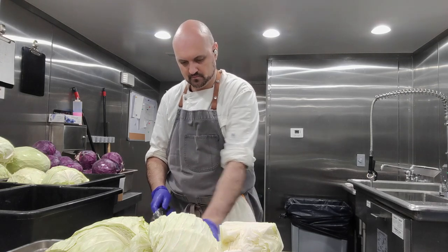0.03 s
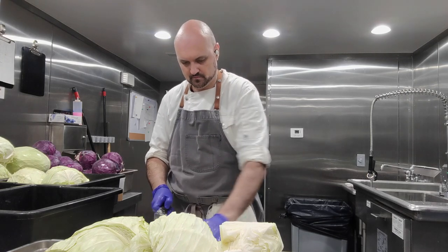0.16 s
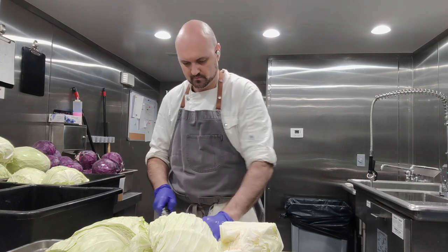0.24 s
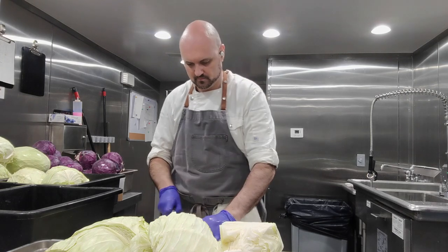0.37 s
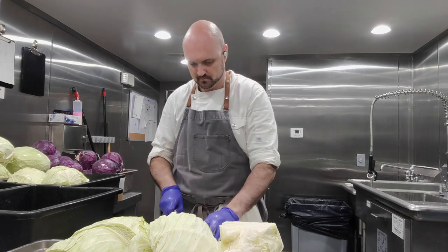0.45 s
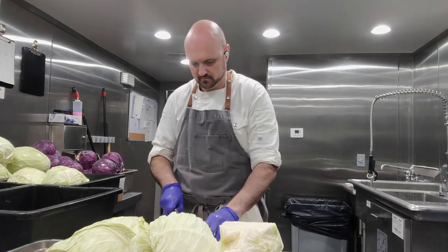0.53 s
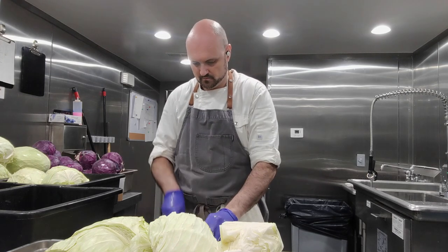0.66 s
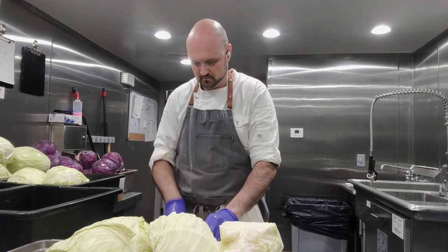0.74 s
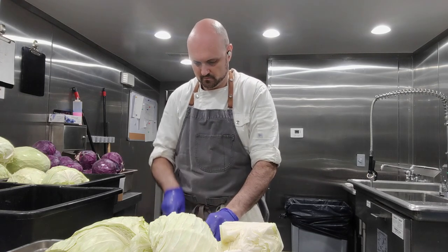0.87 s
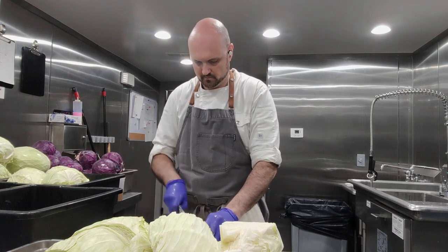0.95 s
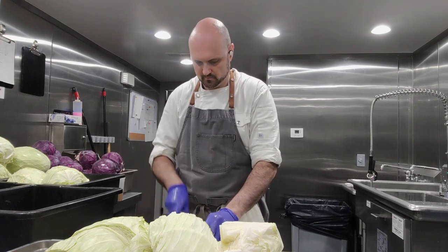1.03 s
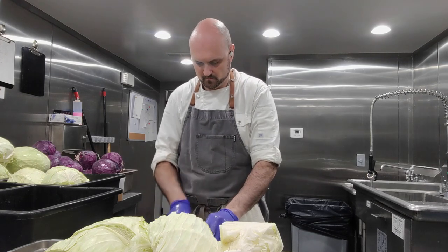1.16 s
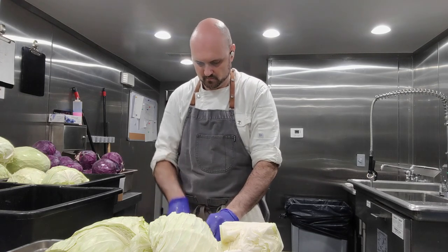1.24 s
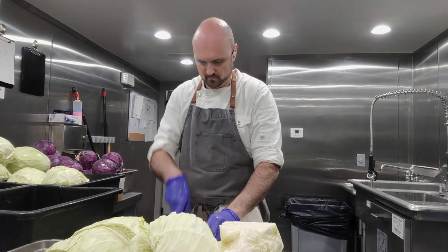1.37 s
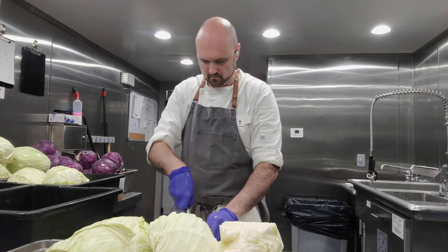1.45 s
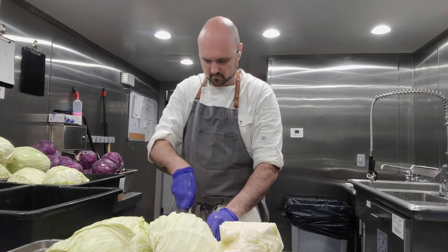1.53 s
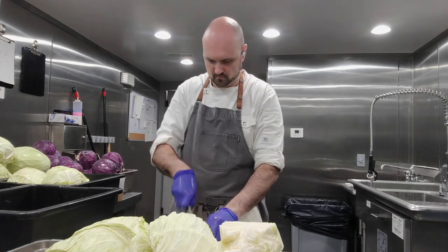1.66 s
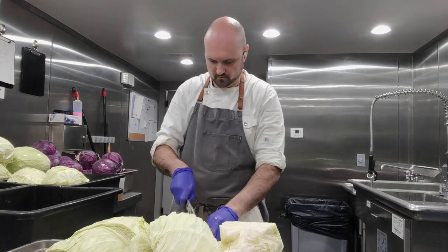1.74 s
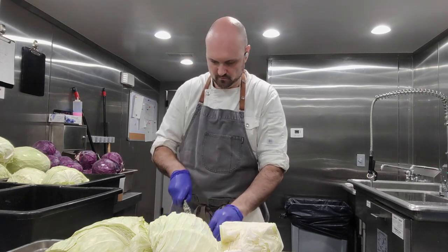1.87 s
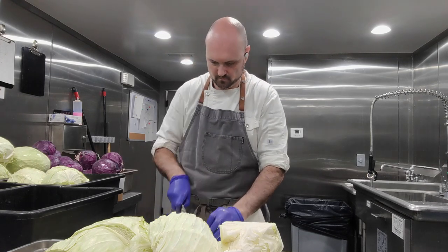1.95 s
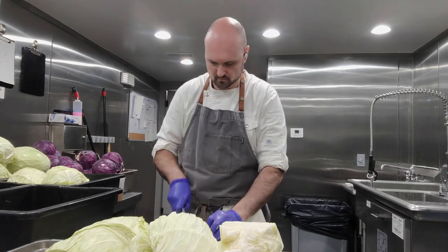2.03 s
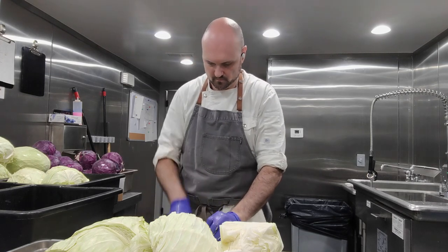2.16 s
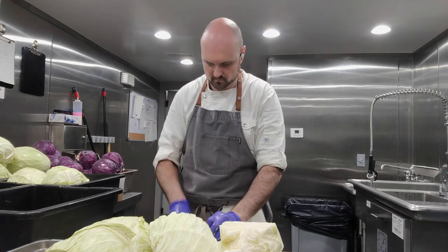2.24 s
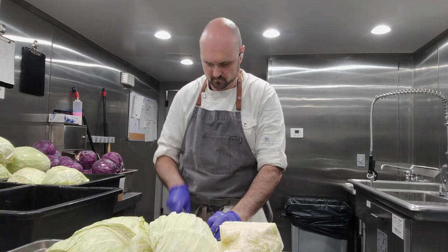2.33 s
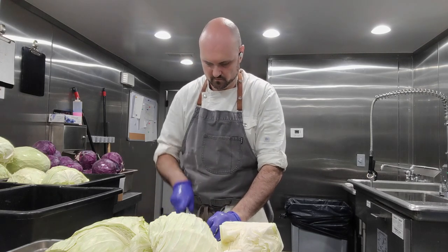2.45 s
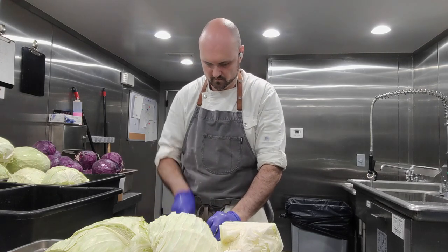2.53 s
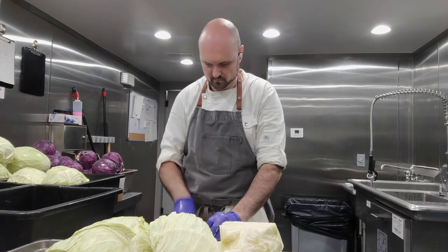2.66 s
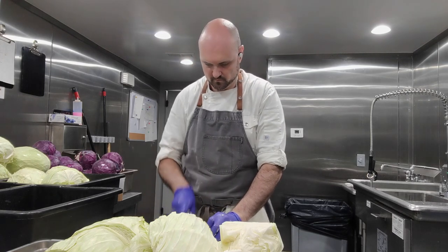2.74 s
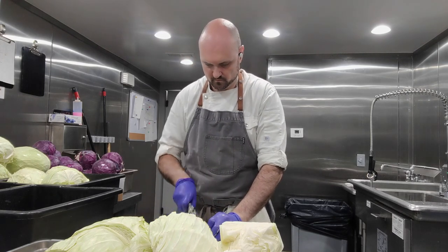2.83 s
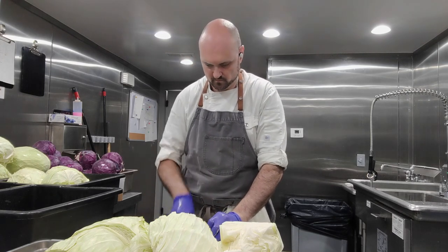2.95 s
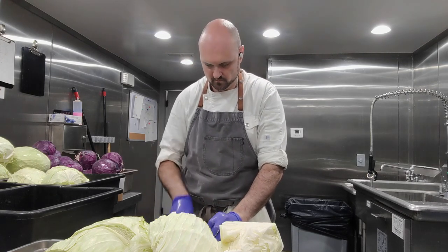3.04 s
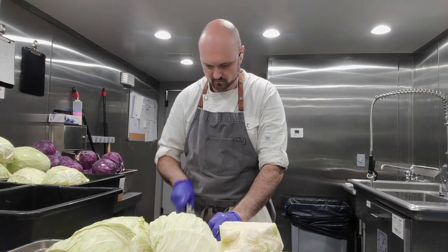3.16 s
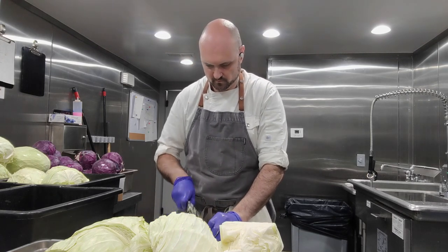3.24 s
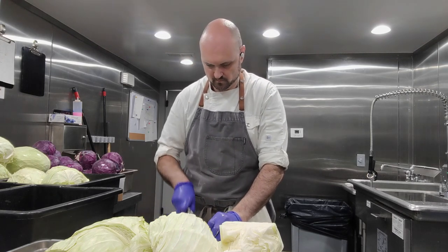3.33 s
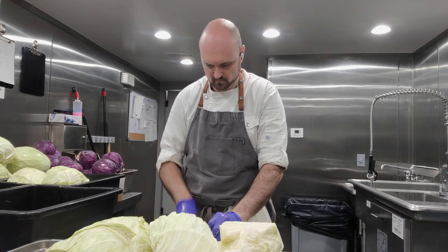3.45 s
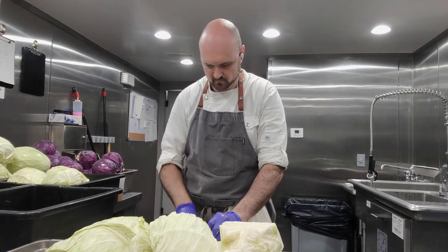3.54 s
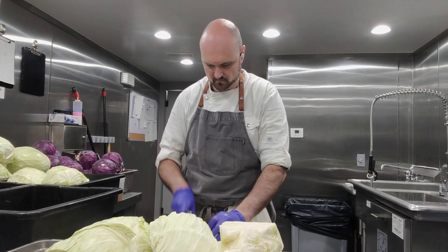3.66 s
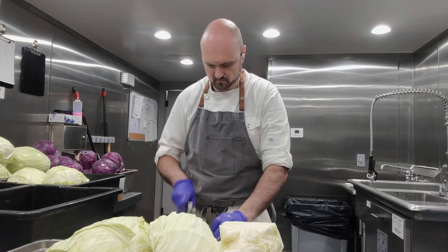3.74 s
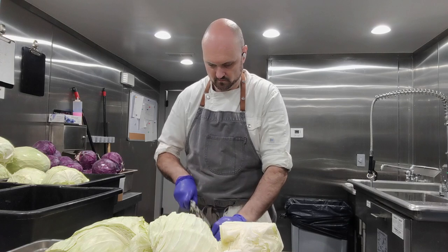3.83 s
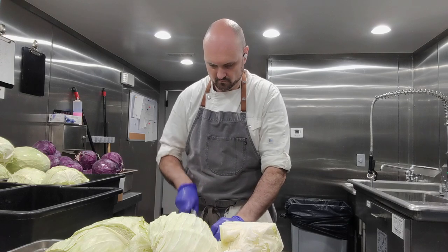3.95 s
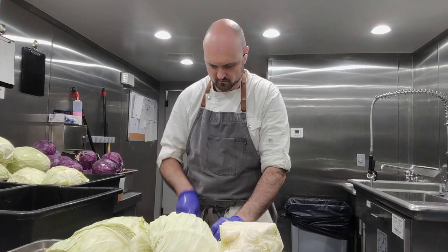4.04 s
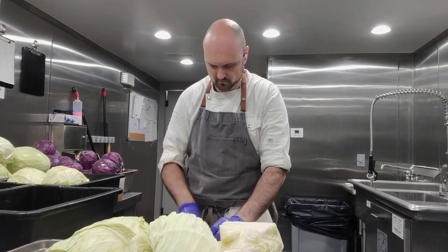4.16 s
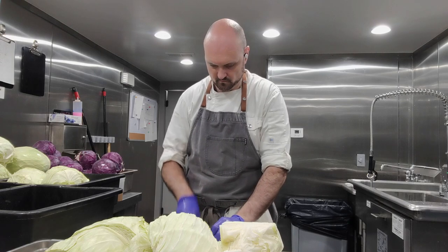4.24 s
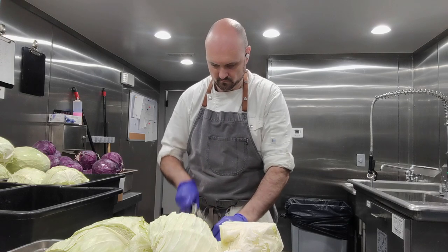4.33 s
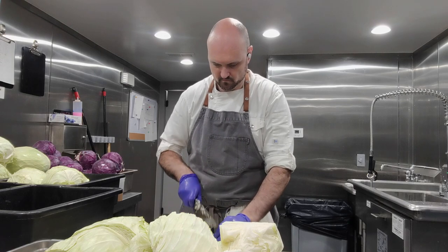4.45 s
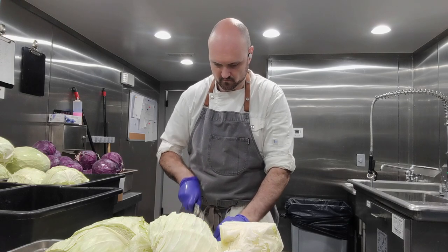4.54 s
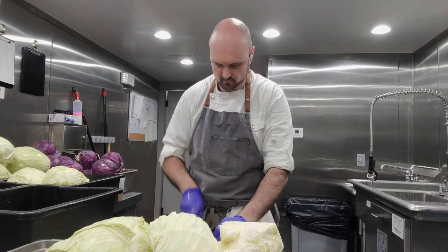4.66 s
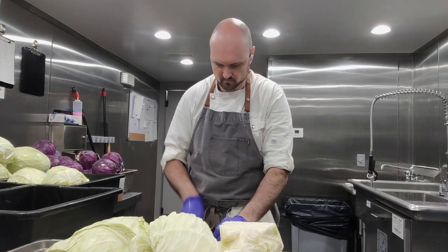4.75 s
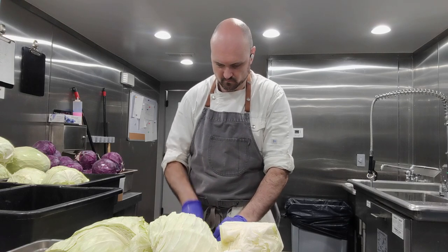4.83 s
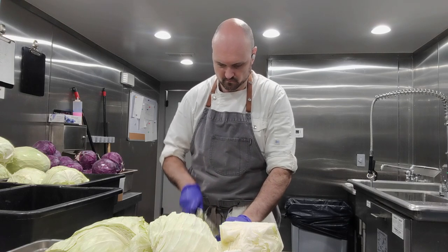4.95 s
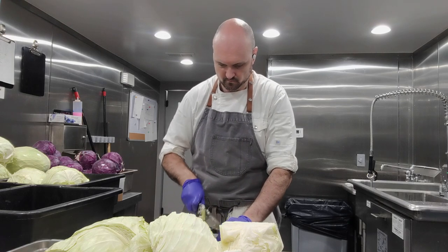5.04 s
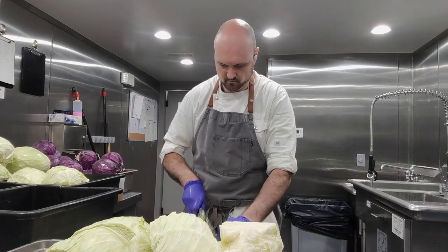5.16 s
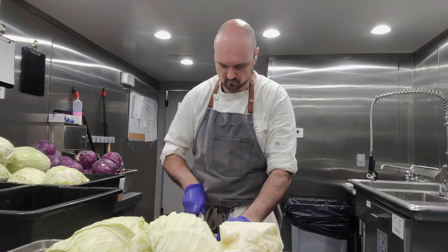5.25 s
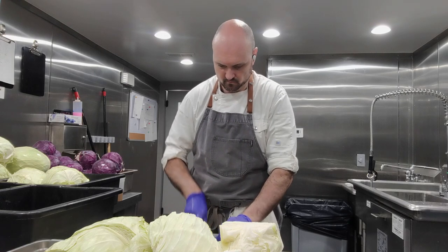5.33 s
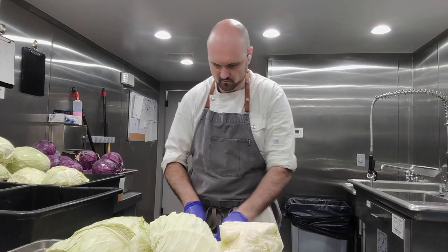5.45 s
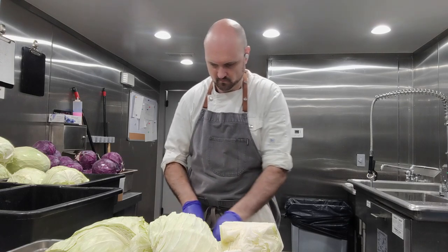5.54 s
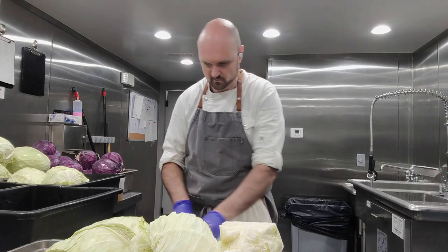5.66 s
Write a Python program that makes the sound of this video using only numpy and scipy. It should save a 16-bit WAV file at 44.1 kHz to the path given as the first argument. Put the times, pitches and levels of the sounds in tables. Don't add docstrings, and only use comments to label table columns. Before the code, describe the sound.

A knife crunches crisply through cabbage and thuds onto a plastic board about twice a second, over low steady kitchen hum and fan air.

```python
import sys
import numpy as np
from scipy import signal
from scipy.fft import rfft, irfft, next_fast_len
from scipy.io import wavfile
from scipy.ndimage import uniform_filter1d

SR = 44100
rng = np.random.default_rng(int(sys.argv[2]) if len(sys.argv) > 2 else 0)


def bounce(signal):
    frames = np.transpose(np.atleast_2d(signal))
    limited = np.clip(frames, -1, 1)
    pcm = np.round(limited * 32767).astype(np.int16)
    wavfile.write(sys.argv[1], SR, pcm)


def undo_db(level):
    steps = np.asarray(level, float) / 20
    return 10 ** steps


N = 251034
T = np.arange(N) / SR

# start/s, length/s, level on entry/dB, level at end/dB, dullness/dB
STROKES = [(0.067, 0.17, -69, -56, 10.5), (0.257, 0.067, -52.5, -59, 11.5),
           (0.634, 0.089, -59, -46.5, -0.5), (0.727, 0.12, -49, -54.5, -2), (1.061, 0.047, -63, -43, -7),
           (1.115, 0.086, -45.5, -45.5, 0), (1.509, .04, -54.5, -56.5, -7), (1.786, 0.035, -66, -72, 10),
           (1.997, 0.044, -65, -59, -1), (2.077, 0.17, -51, -45.5, 0), (2.235, 0.041, -50, -64, -10),
           (2.528, 0.097, -53, -37, -0.5), (2.942, 0.051, -60, -43.5, -2.5), (3.008, 0.06, -53, -52, 3),
           (3.355, .03, -61, -67, -4), (3.405, 0.06, -52.5, -43.5, -4.5), (3.458, 0.086, -44.5, -42, 2.5),
           (3.969, 0.027, -50, -65, -5), (4.031, 0.085, -51, -39, -0.5), (4.132, 0.05, -50, -43, 5.5),
           (4.622, 0.023, -52.5, -61.5, 7), (4.67, .035, -55, -51.5, -8), (4.698, 0.13, -50.5, -41.5, -1.5),
           (5.26, .13, -68.5, -48.5, -4),
           (5.387, 0.033, -47.5, -42.5, 3),
    (5.44, 0.055, -55, -48.5, -12),
    (5.585, .11, -54, -66, 11),
           (1.34, 0.14, -70, -66, 6), (1.9, 0.046, -65, -66.5, 0), (0.004, .07, -74, -76, 20),
          (0.61, 0.032, -72, -66, -3), (2.9, 0.092, -64, -73, 11), (4.86, .14, -58, -74, -12),
          (.33, .12, -67, -67.5, 5), (1.73, .08, -73, -72, -4)]
# t/s, level/dB
SKIN_BURSTS = [(0.0, -63), (.648, -62), (1.067, -62), (1.098, -53), (2.015, -62), (2.53, -62), (2.955, -59),
               (3.401, -50), (4.035, -55), (4.05, -51), (4.625, -61), (4.708, -51), (4.795, -50),
               (5.259, -58), (5.598, -54)]
# centre f/Hz, room t60/s, level re treble/dB, share of dullness, share heard directly
TEAR_BANDS = [(1550, 0.58, -10, 0.76, 0.19), (4220, 0.5, -5, 0.35, 0.41), (8490, 0.45, -2, -0.2, 0.39),
              (9800, 0.43, -10, -.1, 0.45), (14700, 0.33, -19, -.2, .49)]
# f/Hz, level/dB per Hz
TEAR_TONE = [(530, -33), (900, -20), (978, -5.5), (1100, -5.5), (1450, -7.5), (1800, -7.5), (2200, -9),
             (2310, -8.5), (2510, -9.5), (4890, -9.5), (6670, -9.5), (8470, -5), (11100, -36.5),
             (15600, -53)]
DEEPER_DB = 5.5
BITE_S, LET_GO_S = 0.009, 0.019
SKIN_S, SKIN_DULL_DB = 0.012, 1
SKIN_TOP_DB = 5

# table bass/dB, board bass/dB, low ring/dB
LANDINGS = [
    (0.298, -50, 0, -4, 6.5),
    (0.787, -24, -10, -3.5, -1),
    (1.203, -20, -8, -3, -4),
    (2.231, -18, -12, -5.5, -6),
    (2.66, -14.5, -12.5, -7.5, -6),
    (3.066, -24, -7, -5.5, -2.5),
    (3.55, -25.5, -5, -2.5, 1.5),
    (4.182, -19.5, -5, -8.5, 0.5),
    (4.833, -25.5, -3.5, -1.5, 0.5),
    (5.416, -26.5, 1, 0, 3.5),
]
# f/Hz, level/dB, t60/s
BOARD_MODES = [(195.3, 4.5, 0.12), (242.4, -4.5, 0.31), (270.2, 4.5, 0.13), (339, -3.5, 0.28),
               (440.8, -10, 0.43), (445, -7.5, 0.063), (526, -1.5, 0.043), (618.4, -8.5, 0.12),
               (731, -2.5, 0.092), (757, -12.5, 0.4), (810, 3, 0.034), (822.6, -14.5, 0.45),
               (904, 4.5, 0.023), (943, -12.5, 0.4), (1039, 2.5, 0.054), (1190, -2.5, 0.17),
               (1260, 1.5, 0.055), (1610, -9, 0.05), (1810, -25, .05)]
# f/Hz, level/dB per Hz
THUD_TONE = [(24, -46), (40, -20), (102, -6), (255, -22), (325, 1), (421, 8.5), (545, 1.5), (758, -3.5),
             (1190, -16), (2500, -79), (3250, -47), (5500, -120)]
# delay/s, level/dB
WALL_ECHOES = [(.004, 6), (.009, 2), (.014, 7), (0.019, -22), (0.034, 3.5), (0.051, -0.5), (.062, -1.5),
               (.085, -6), (.118, -9.5), (.150, -13.5)]
UPPER_DB = -12.5
SHUDDER_LAG_S, SHUDDER_DB = 0.048, -17.5

# t/s, peak level/dB, f/Hz
RIB_SNAPS = [(0.6464, -48.5, 3760), (0.903, -55, 4400), (1.1014, -45, 5100), (1.1238, -39.5, 5550),
             (1.1707, -42, 6530), (1.171, -42, 3540), (1.523, -50, 5490), (2.0308, -55, 6300),
             (2.5925, -36, 5030), (2.6414, -34, 2900), (3.5269, -34, 3770), (4.1186, -41, 4200),
             (4.713, -41, 4120), (5.4397, -41, 4300), (5.5087, -42.5, 4380), (5.5994, -46, 5230)]
# t/s, peak level/dB
EDGE_TOUCHES = [(1.0714, -64), (1.52, -48), (1.7, -56), (2.5426, -53), (2.971, -45), (3.4057, -52),
                (3.9774, -54), (4.6843, -44), (5.391, -42)]
# f/Hz, level/dB, t60/s
BLADE_PING = [(8750, -55, 0.42), (10600, -71, 0.23), (11800, -74, 0.2), (14000, -76, .2), (7300, -60, 0.19)]
# start/s, end/s, f/Hz
SQUEAK = (.895, 1.1, 4560)
RIB_WIDTH_HZ, RIB_T60_S = 400, 0.33
BRIGHT_HZ, BRIGHT_WIDTH_HZ, BRIGHT_T60_S = 8300, 1100, 0.25
PING_S = 1.518

# f/Hz, level/dB
HUM = [(120, -42.5), (240, -64.5)]
# f/Hz, level/dB per Hz
FAN_TONE = [(15, -47), (25, -32), (37, -33), (84, -27.5), (126, -1.5), (156, -10), (193, -14), (267, -17),
            (340, -19.5), (805, -21), (972, -28.5), (1850, -40.5), (6570, -47.5), (8150, -51),
            (15600, -57.5)]
# f/Hz, width/Hz, level/dB
FAN_DUCTS = [(74, 31, -59), (185.3, 31.5, -56.5), (263.9, 7.7, -59.5), (967, 225, -62)]
SWELL_DB, SWELL_PER_S = 3.2, 3.7


def tearing(rate=2500, spread_db=4, patchy_db=3.0):
    size_db = spread_db * np.minimum(rng.exponential(1, N), 4)
    happens = rng.random(N) < rate / SR
    snaps = happens * rng.choice([-1, 1], N) * undo_db(size_db + patchy_db * walk(40))
    centres = np.array(TEAR_BANDS)[:, 0]
    cracks = split(leafy(snaps), centres)
    echoes = split(leafy(rng.standard_normal(N)), centres)
    out = 0
    for (hz, t60, trim_db, dull_share, direct), crack, echo in zip(TEAR_BANDS, cracks, echoes):
        given = effort(dull_share, hz) * undo_db(trim_db) ** 2
        close = level(crack, 0)
        keep = np.exp(-np.log(1e6) / (t60 * SR))
        held = signal.lfilter([1 - keep], [1, -keep], close ** 2 * given)
        room = np.sqrt(max(1 - direct ** 2, 0) * held) * level(echo, 0)
        out = out + room + direct * close * np.sqrt(given)
    return out


def effort(dull_share, hz):
    power = np.full(N, 1e-14)
    for s, length, in_db, end_db, dull_db in STROKES:
        t = T[:int((length + 0.3) * SR)]
        depth = np.minimum(t / length, 1)
        dulling = dull_share * (dull_db + DEEPER_DB * (2 * depth - 1))
        db = in_db + (end_db - in_db) * depth + dulling
        bite = np.minimum(t / BITE_S, 1)
        let_go = np.exp(-np.maximum(t - length, 0) / LET_GO_S)
        add(power, s, undo_db(db) ** 2 * bite * let_go)
    for s, db in SKIN_BURSTS:
        top_db = SKIN_TOP_DB * max(np.log2(hz / BRIGHT_HZ), 0)
        burst = undo_db(db + dull_share * SKIN_DULL_DB + top_db) ** 2
        add(power, s, burst * np.exp(-T[:SR // 5] / SKIN_S))
    return power


def leafy(x, pocket_db=1.5, peak_hz=8400, peak_width_hz=1000, peak_db=-4):
    cells = signal.stft(colour(x, TEAR_TONE), nperseg=256)[2]
    pockets = uniform_filter1d(rng.standard_normal(cells.shape), size=3, axis=0)
    pockets = uniform_filter1d(pockets, size=7, axis=1)
    x = signal.istft(cells * undo_db(pocket_db * pockets / pockets.std()), nperseg=256)[1][:N]
    return x + undo_db(peak_db) * ring(x, peak_hz, peak_width_hz)


def landings(push_s=0.00052, scatter_db=2.2, first_db=2.0, diffuse_db=0, room_db=3, room_t60=0.63,
             crack_db=4, gain_db=-17):
    out, t = np.zeros(N), T[:int(0.6 * SR)]
    hz, db, t60 = np.array(BOARD_MODES).T[:, :, None]
    side = (-1) ** np.arange(len(BOARD_MODES))[:, None]
    push = np.hanning(int(push_s * SR) + 3)
    build = 1 - np.exp(-t / 0.0012)
    fade = np.exp(-np.log(1000) * t / room_t60)
    paths = undo_db(diffuse_db) * tail(room_t60) * build
    paths[0] = undo_db(first_db)
    for lag, echo_db in WALL_ECHOES:
        paths[int(lag * SR)] += undo_db(echo_db)
    for s, peak_db, deep_db, bass_db, low_db in LANDINGS:
        up_db = low_db + UPPER_DB
        # f/Hz, level/dB
        tilt = np.array([(60, deep_db - 30), (150, deep_db), (205, deep_db), (245, bass_db), (300, bass_db),
                         (360, low_db), (560, low_db), (640, 0), (850, 0), (1060, up_db)])
        chance = rng.standard_normal((len(BOARD_MODES), 2, 1))
        gain = undo_db(db + np.interp(hz, *tilt.T) + scatter_db * chance[:, 0])
        swing = np.sin(2 * np.pi * hz * (1 + 0.0037 * chance[:, 1]) * t)
        modes = gain * side * swing * np.exp(-np.log(1000) * t / t60)
        crack = undo_db(crack_db + up_db) * np.sin(2 * np.pi * 1250 * t) * np.exp(-t / 0.00046)
        noise = level(colour(rng.standard_normal(len(t)), THUD_TONE), room_db)
        room = colour(noise, tilt) * build * fade
        blow = signal.fftconvolve(modes.sum(0) + crack, paths)[:len(t)] + room
        add(out, s - 0.002, -undo_db(peak_db + gain_db) * np.convolve(blow, push / push.sum()))
    return signal.sosfilt(signal.butter(2, 110, "high", fs=SR, output="sos"), out)


def shudder(hz=62, width_hz=35, length_s=0.06):
    swell = 0
    for s, db, *_ in LANDINGS:
        late = T - s - SHUDDER_LAG_S
        swell = swell + undo_db(db + SHUDDER_DB) * np.exp(-0.5 * (late / length_s) ** 2)
    rumble = ring(ring(rng.standard_normal(N), hz, width_hz), hz, width_hz)
    return swell * level(rumble, -12.5)


def ticks(gain_db=-12, squeak_db=-65, squeak_width_hz=200, ping_width_hz=500):
    out = np.zeros(N)
    ribs = [(*row, RIB_WIDTH_HZ, RIB_T60_S) for row in RIB_SNAPS]
    edges = [(*row, BRIGHT_HZ, BRIGHT_WIDTH_HZ, BRIGHT_T60_S) for row in EDGE_TOUCHES]
    for s, peak_db, hz, width_hz, t60 in ribs + edges:
        x = ring(ring(tail(max(t60, 0.03)), hz, 2 * width_hz), hz, 2 * width_hz)
        start_rms = np.sqrt(np.mean(x[:600] ** 2))
        add(out, s, undo_db(peak_db + gain_db) * x / start_rms)
    for hz, db, t60 in BLADE_PING:
        add(out, PING_S, level(ring(tail(t60, length=0.34), hz, ping_width_hz), db - 12))
    start, end, hz = SQUEAK
    gate = np.interp(T, [start, start + 0.01, end - 0.1, end], [0, 1, 0.55, 0.1], right=0)
    rub = ring(ring(rng.standard_normal(N), hz, squeak_width_hz), hz, squeak_width_hz)
    return out + gate * level(rub, squeak_db)


def machines(air_db=-52, flicker_db=0.0):
    out = np.zeros(N)
    for hz, db in HUM:
        out += np.sqrt(2) * undo_db(db + 1.0 * walk(2.78)) * np.sin(2 * np.pi * hz * T)
    for hz, width_hz, db in FAN_DUCTS:
        out += level(ring(ring(rng.standard_normal(N), hz, 2 * width_hz), hz, 2 * width_hz), db)
    swell = undo_db(SWELL_DB * walk(SWELL_PER_S))
    centres = [60, 200, 400, 700, 1200, 2500, 5000, 10000]
    bands = split(level(colour(rng.standard_normal(N), FAN_TONE), air_db), centres)
    for hz, band in zip(centres, bands):
        drift = swell if 300 < hz < 1400 else 1
        out += undo_db(flicker_db * walk(6.29)) * band * drift
    return out


def tail(t60, length=0.6):
    t = T[:int(length * SR)]
    h = rng.standard_normal(len(t)) * np.exp(-np.log(1000) * t / t60)
    return h / np.sqrt(np.sum(h ** 2))


def ring(x, hz, width_hz):
    return signal.lfilter(*signal.iirpeak(hz, hz / width_hz, fs=SR), x)


def colour(x, tone):
    size = next_fast_len(len(x) + 4096)
    hz = np.arange(size // 2 + 1) * SR / size + 1
    tone_hz, tone_db = np.array(tone).T
    gain = undo_db(np.interp(np.log(hz), np.log(tone_hz), tone_db))
    return irfft(rfft(x, size) * gain, size)[:len(x)]


def split(x, centres):
    size = next_fast_len(len(x))
    log_hz = np.log(np.arange(size // 2 + 1) * SR / size + 1)
    spectrum = rfft(x, size)
    bands = []
    for one in np.eye(len(centres)):
        share = np.interp(log_hz, np.log(centres), one)
        bands.append(irfft(spectrum * share, size)[:len(x)])
    return bands


def walk(rate):
    k = int(SR / rate)
    steps = np.repeat(rng.standard_normal(N // k + 1), k)
    return 0.49 * uniform_filter1d(uniform_filter1d(steps, k), k)[:N]


def level(x, db):
    return x * undo_db(db) / np.sqrt(np.mean(x ** 2))


def add(out, t, x):
    i = int(t * SR)
    out[i:i + len(x)] += x[:len(out) - i]


def scene():
    return (tearing() + landings() + shudder() + ticks() + machines())[None]


def band_limit(x):
    return signal.sosfilt(signal.butter(12, 15700, fs=SR, output="sos"), x)


def record(dry):
    return band_limit(dry)


dry = scene()
out = record(dry)
bounce(out)
```